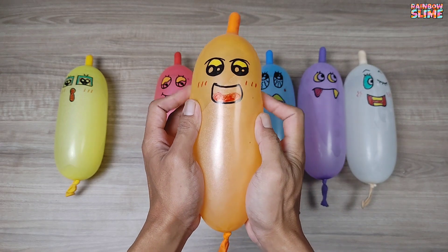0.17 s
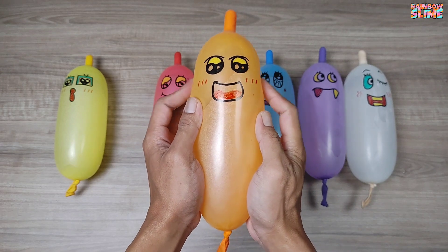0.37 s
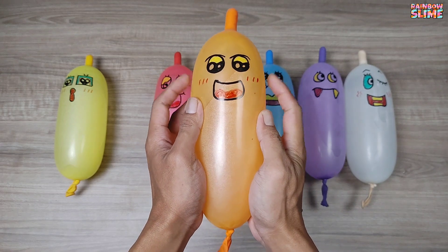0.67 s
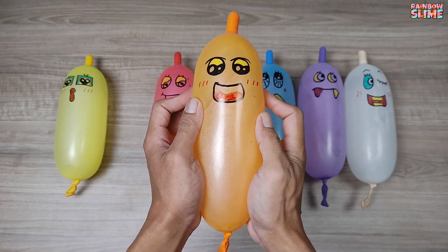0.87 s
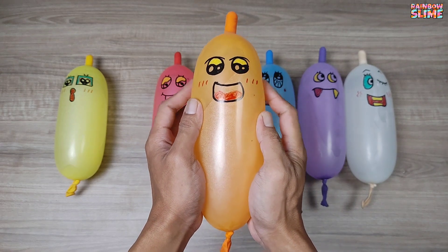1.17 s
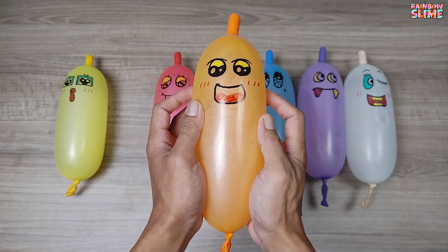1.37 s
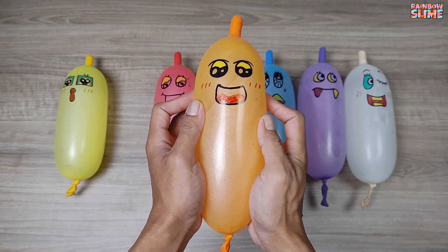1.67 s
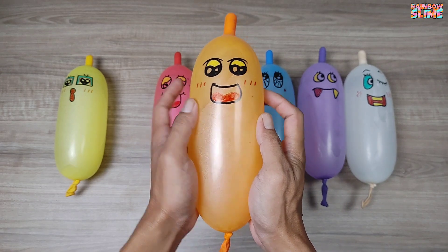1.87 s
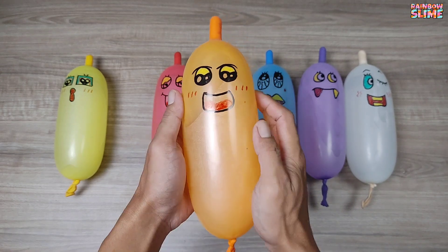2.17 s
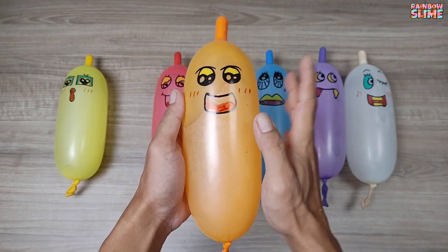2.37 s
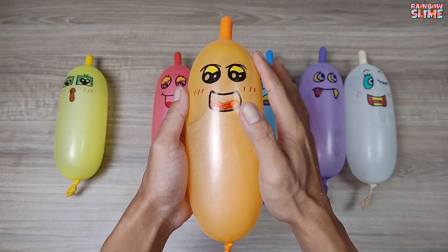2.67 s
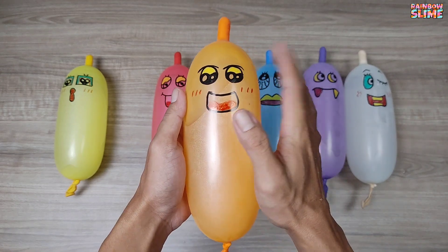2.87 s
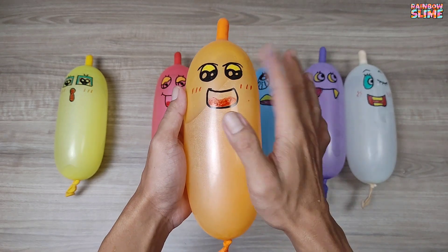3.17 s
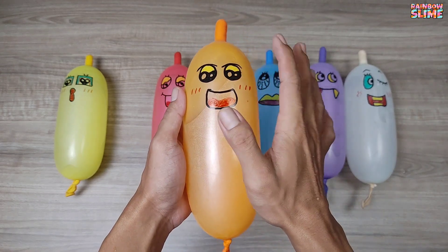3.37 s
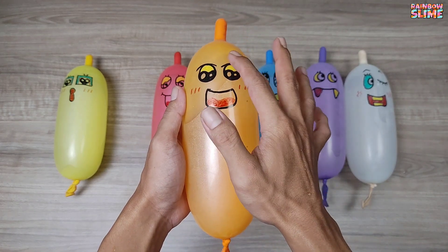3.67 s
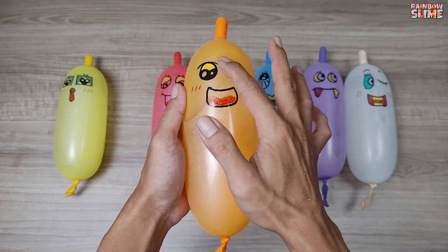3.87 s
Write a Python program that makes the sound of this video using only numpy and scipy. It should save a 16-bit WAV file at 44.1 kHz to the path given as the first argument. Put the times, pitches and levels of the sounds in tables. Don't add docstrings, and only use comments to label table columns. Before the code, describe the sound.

Five quick, stuttering squeaky rubs on a filled rubber balloon, then several light hollow fingertip taps, close up in a quiet room.

```python
import sys
import numpy as np
from scipy import signal
from scipy.fft import rfft, irfft
from scipy.io import wavfile
from scipy.ndimage import uniform_filter1d

SR = 44100
rng = np.random.default_rng(int(sys.argv[2]) if len(sys.argv) > 2 else 0)


def invert_db(level):
    return 10 ** (np.asarray(level, dtype=float) / 20)


def wrap_up_sound(samples):
    columns = np.atleast_2d(samples).T
    tamed = np.clip(columns, -1, 1)
    steps = np.round(tamed * 32767).astype(np.int16)
    wavfile.write(sys.argv[1], SR, steps)


N = 177458

# (start [s], end [s], pressure [dB], dry skin [dB], release [dB/s])
STROKES = [
    (.005, 0.053, -19.5, -96.5, 208),
    (0.093, 0.332, -5, -71.5, 122),
    (0.549, 0.749, -5, -67.5, 110),
    (0.976, 1.123, -3, -67, 111.5),
    (1.367, 1.517, -2.5, -66.5, 115.5),
    (1.743, 1.933, -3.5, -60, 118),
]
# (peak time [s], peak level [dB], wall minus peak [dB])
SLIPS = [(.1227, -31, -30), (.1717, -23, -24), (.1752, -22, -15), (.2107, -24, -27), (.2232, -19, -21),
         (.2659, -18, -21), (.3132, -18, -22), (.5762, -29, -22), (.5888, -20, -23), (.6016, -24, -26),
         (.6048, -20, -19), (.6202, -21, -14), (.6433, -19, -15), (.6583, -20, -12), (.6927, -17, -17),
         (.7091, -24, -12), (.7175, -26, -14), (.73, -16, -14), (.9868, -22, -24), (1.0007, -20, -18),
         (1.0066, -25, -28), (1.0135, -20, -15), (1.0179, -24, -23), (1.0272, -16, -20), (1.0328, -24, -24),
         (1.0461, -22, -15), (1.0646, -18, -19), (1.0773, -25, -11), (1.0808, -21, -17), (1.098, -18, -18)]
# (peak time [s], peak level [dB], wall minus peak [dB])
LATE_SLIPS = [(1.3707, -28, -27), (1.3796, -24, -24), (1.3885, -22, -21), (1.3968, -18, -22),
              (1.4016, -22, -18), (1.41, -17, -18), (1.4147, -18, -17), (1.4272, -18, -24),
              (1.444, -27, -18), (1.4617, -18, -15), (1.4737, -20, -18), (1.4859, -26, -8),
              (1.4975, -26, -14), (1.5041, -20, -13), (1.7494, -22, -27), (1.7588, -19, -24),
              (1.7682, -20, -21), (1.7765, -18, -22), (1.7861, -18, -24), (1.8, -19, -19),
              (1.8166, -19, -19), (1.8223, -23, -28), (1.8355, -23, -11), (1.848, -25, -11),
              (1.8633, -19, -14), (1.869, -24, -11), (1.8825, -19, -13), (1.9033, -17, -16),
              (1.9138, -18, -17), (1.9274, -18, -22)]
# (time [s], peak level [dB], belly re peak [dB], wall re peak [dB])
STICKS = [(0.091, -43, -4, -34), (0.0982, -30, -13, -38), (0.41, -35, -37, -18), (0.444, -41, -2, -15),
          (0.5527, -35.5, -5, -16), (0.831, -41.5, 2.5, -22), (0.9744, -32.5, -38, -18),
          (1.129, -41.5, 1, -1), (1.2265, -39.5, -4.5, -18.5), (1.669, -37, -5, -12),
          (1.6872, -39.5, -22, -33), (1.738, -32, -33, -29), (2.019, -43, -9, -26), (2.0929, -34, -30, -21),
          (2.141, -56, -10, -20), (2.1851, -36.5, -9.5, -20.5), (2.8074, -40.5, -2, -20),
          (2.821, -52.5, 3.5, -22), (2.829, -45, -21, -7.5), (3.098, -50, -9, -20),
          (3.1114, -40.5, -11.5, -15), (3.395, -46, -14, -9), (3.402, -44, -20, -15), (3.41, -42, -9, -12),
          (3.629, -55, -16, -11)]
# (frequency [Hz], width [Hz], level [dB])
BODY = [(965, 60, -45), (1009, 101.5, 9.5), (1003.7, 122, 13), (1322, 190, -2), (1332, 61, 4),
        (1404, 100, -4.5), (1360, 46, -12), (2168, 260, -17.5)]
# (frequency [Hz], width [Hz], level [dB])
WALL = [(3157, 154, -1), (3528, 467, 0.5), (4994, 460, -7.5), (5575, 138, -10.5), (5960, 260, -11),
        (6450, 310, -3.5), (6840, 200, -2.5), (7360, 660, -13.5), (8530, 230, -5), (10900, 1700, -20)]
# (frequency [Hz], width [Hz], level [dB])
BELLY = [(146.5, 16, -13.5), (265.3, 61, -11), (335.7, 23.2, -2.5), (405, 42, 1.5), (473, 47.4, 6.5),
         (676.5, 97, -3)]
# (from [s], low belly [dB], 2.2 kHz ring [dB], 8.5 kHz ring [dB], 5 kHz ring [dB])
GRIPS = [
    (0, 7.5, 6.6, -5, -4),
    (.53, 4, 6.4, -14, -1.5),
    (.95, 2, 2.2, -7, 1.5),
    (1.35, -1.5, 1.2, -1, 3),
    (1.72, -0.5, 2.6, -1, 2.5),
]
# (low edge [Hz], high edge [Hz])
GRIP_BANDS = [
    (120, 340),
    (1900, 2600),
    (8100, 9300),
    (4500, 5700),
]
# (frequency [Hz], width [Hz])
NULLS = [(585, 18.3), (770, 38), (1150, 49), (1860, 153), (2720, 80), (4600, 94), (6200, 650), (8150, 1440)]
# (time [s], peak level [dB], crack [dB], contact [s], belly re peak [dB], after-ring re peak [dB])
TAPS = [
    (2.435, -42, -71, 0.025, -17, -25),
    (2.796, -32, -65.5, 0.031, -15, -26.5),
    (3.086, -31, -61.5, 0.038, -25.5, -24.5),
    (3.376, -32, -61.5, 0.036, -24, -22.5),
    (3.618, -54, -88, 0.029, -24, -29),
    (3.637, -41, -69.5, 0.028, -10, -21),
    (3.655, -42.5, -95, 0.033, -31.5, -32),
]
# (frequency [Hz], width [Hz], level [dB])
TAP_RINGS = [
    [(1000, 170, 8.5), (3400, 31, -7), (4730, 76, -26)],
    [(490, 13, -10), (949, 19.5, 6), (1220, 43, -8.5), (1510, 32, -3), (2316, 42, -17), (3040, 66, -17)],
    [(330, 99, -11.5), (690, 23, -10), (1023, 35, 3), (1274, 38, 4), (1540, 25, 0.5), (2380, 94, -17),
     (3210, 41, -19), (3810, 56, -9.5)],
    [(366, 66, -4.5), (949, 26, 5), (1311, 15, 3), (1554, 53, -5.5), (3380, 41, -3.5), (5200, 75, -13),
     (6300, 54, -17), (7140, 65, -19.5)],
    [(406, 100, -1), (1040, 210, 0), (2440, 240, -8)],
    [(409, 62, -1.5), (1020, 46, 0), (1152, 16, 4), (1275, 25, 5.5), (1527, 15, 8), (3160, 25, -15),
     (3850, 56, -14)],
    [(387, 81, 4), (1020, 64, 5), (1300, 32, 1), (1470, 42, 0)],
]
# (frequency [Hz], width [Hz], level [dB])
AFTER_RING = [(887, 14, 4.5), (1010, 17, -1.5), (304, 4.3, 2.5), (346, 3.6, 6.5)]
# (time [s], length [s], level [dB], brightness [dB])
BRUSHES = [
    (0.436, .02, -66, -4),
    (1.658, 0.018, -65, -4),
    (2.043, 0.043, -62, -3),
    (2.165, 0.039, -66.5, -2.5),
    (2.297, 0.087, -70, -0.5),
    (2.443, .025, -75, -6),
]
# (start [s], end [s], start frequency [Hz], end frequency [Hz], level [dB])
TONES = [
    (3.818, 3.832, 1186, 1340, -58),
    (3.923, 4.098, 2541, 2543, -75.5),
]
# (delay [s], level [dB])
ECHOES = [(.003, -24), (.0086, -14), (0.0106, -18), (0.0126, -14)]
# (low edge [Hz], t60 [s], level [dB])
ROOM = [(145.6, 0.64, -3), (427, 0.35, -2.5), (743, 0.67, -5), (1012, 0.7, -13), (1690, 0.54, -8),
        (2700, 0.67, -9.5), (4370, 0.11, -26.5), (9000, 0.2, -23.5)]
# (frequency [Hz], density [dB per Hz])
AIR = [(25, -11), (45, -0.5), (70, -19), (100, -5.5), (200, 0), (400, -4.5), (1000, -14), (2000, -14.5),
       (3300, -19), (5700, -27.5), (6300, -39.5), (8000, -32.5), (11800, -22.5), (15400, -27.5)]
# (frequency [Hz], level [dB])
HUM = [(101, -79.5), (189, -77.5)]
# (stroke start [dB], stroke end [dB], share of release, rest [dB], share of skin dryness)
CREEP_BODY, CREEP_WALL = (-39.5, -50.5, 0.65, -91.5, 0.02), (-70, -61, 2.33, -102.5, 0.5573)
CREEP_BELLY, CREEP_LOW_BELLY = (-45, -54, 1.5, -94.5, 0.0657), (-58.5, -50, 1.04, -94.5, -0.3454)

SNAP_HZ, SNAP_S = 1182, 0.0005
REBOUND_S, REBOUND_DB, REBOUND_SCATTER_DB = 0.0032, -10, 2.5
CHATTER_DB, CHATTER_SCATTER_DB = -31.5, 1.5
STICK_S, STICK_DB = 0.0085, -11
WALL_START_DB, WALL_END_DB, WALL_SCATTER_DB = -23, -11.5, 0.5
BELLY_DB, BELLY_FOLLOWS = -30, 0.22
BELLY_MOST_DB = -5.5
BELLY_TILT_START_DB, BELLY_TILT_END_DB = 5.5, -6
GRAB_DB_PER_S = 1501.5
USUAL_SKIN_DB = -76
TAP_CREEP_DB, TAP_CREEP_FADE_DB_PER_S = -56, 48
TAP_SKIN_DB, TAP_SKIN_FADE_DB_PER_S = -42, 104.5
SKIN_REST_DB, SKIN_START_DB, SKIN_FADE_DB_PER_S = -94, -6, 72
BRUSH_RISE_DB_PER_S, BRUSH_FADE_DB_PER_S = 597, 302
THUD_S, SLIP_THUD_DB, TAP_THUD_DB = 0.0014, -42, -28
THUD_GROWTH_DB_PER_S = 2
AIR_DB = -70.5


def unit(x):
    return x / np.sqrt(np.mean(x ** 2))


def band(x, lo_hz, hi_hz):
    sos = signal.butter(2, [lo_hz, min(hi_hz, 0.45 * SR)], "band", fs=SR, output="sos")
    return signal.sosfilt(sos, x)


def add(out, s, y):
    i = max(int(s * SR), 0)
    out[i:i + len(y)] += y[:N - i]


def swell(start, end, start_db, end_db, rise_db_s, fade_db_s):
    t = np.arange(N) / SR
    held = np.interp(t, [start, end + 1e-3], [start_db, end_db])
    before, after = np.maximum(start - t, 0), np.maximum(t - end, 0)
    return invert_db(held - rise_db_s * before - fade_db_s * after)


def ring(modes, scatter_db, detune, rise_s):
    hz, width, db = np.array(modes, float).T[:, :, None]
    level_luck, pitch_luck = rng.standard_normal((2, len(modes), 1))
    t = np.arange(8192 if width.min() < 20 else 4096) / SR
    sign = (-1.) ** np.arange(len(modes))[:, None]
    decay = width * np.exp(-np.pi * width * t)
    waves = np.sin(2 * np.pi * hz * (1 + detune * pitch_luck) * t)
    y = (sign * invert_db(db + scatter_db * level_luck) * decay * waves).sum(0)
    y = y * (1 - np.exp(-t / rise_s))
    return y / np.abs(y).max()


def knock(scatter_db, detune):
    u = np.arange(4096) / SR / SNAP_S
    hz = SNAP_HZ * (1 + 0.046 * rng.standard_normal())
    snap = u ** 2 * np.exp(-u) * np.sin(2 * np.pi * hz * u * SNAP_S)
    y = snap + invert_db(-11.5) * ring(BODY, scatter_db, detune, 0.00024)
    return y / np.abs(y).max()


def progress(s):
    start, end = np.array(STROKES)[:, :2].T
    k = max(np.searchsorted(start, s) - 1, 0)
    return np.clip((s - start[k]) / (end[k] - start[k]), 0, 1)


def slip_rows(count=7):
    big = np.array(SLIPS + LATE_SLIPS)
    scatter = rng.standard_normal(big.shape) * [0.0004, REBOUND_SCATTER_DB, 2.5]
    again = big + [REBOUND_S, REBOUND_DB, -2.5] + scatter
    small = []
    for start, end, pressure_db, *_ in STROKES:
        for k, (place, size, bright) in enumerate(rng.standard_normal((count, 3))):
            u = (k + 0.5 + 0.3 * place) / count
            s = start + (end - start) * u
            wait = big[:, 0] - s
            next_slip_s = np.where(wait > 0, wait, 9).min()
            hush_db = STICK_DB * np.exp(-next_slip_s / STICK_S)
            db = CHATTER_DB + pressure_db + hush_db + CHATTER_SCATTER_DB * size
            wall_db = WALL_START_DB + (WALL_END_DB - WALL_START_DB) * u + WALL_SCATTER_DB * bright
            small.append((s, db, wall_db))
    rows = []
    for s, db, wall_db in np.concatenate([big, again, small]):
        belly_db = min(BELLY_DB + BELLY_FOLLOWS * (db + 21) - db, BELLY_MOST_DB)
        rows.append((s, db, belly_db, wall_db))
    return rows


def slips():
    out, modes = np.zeros(N), np.array(BELLY)
    octaves = np.log2(modes[:, 0] / 400)
    for s, db, belly_db, wall_db in slip_rows() + STICKS:
        body = knock(2.5, 0.012)
        wall = ring(WALL, 2.5, 0.012, 0.0008)
        tilt_db = np.interp(progress(s), [0, 1], [BELLY_TILT_START_DB, BELLY_TILT_END_DB]) * octaves
        belly = ring(modes + np.outer(tilt_db, [0, 0, 1]), 3.0, 0.025, 0.0007)
        add(out, s - 0.001, invert_db(db - 2.5) * body + invert_db(db + wall_db) * wall)
        add(out, s - 0.001, invert_db(db + belly_db - 5.0) * belly)
    return out


def grains(rate, spread_db):
    when, sign, size = rng.random(N), rng.standard_normal(N), rng.exponential(size=N)
    return unit((when < rate / SR) * sign * invert_db(spread_db * np.minimum(size, 4)))


def pressure(start_db, end_db, share, rest_db, dry):
    rub, settle = 0, 0
    for start, end, db, skin_db, fade in STROKES:
        dryness = invert_db(dry * (skin_db - USUAL_SKIN_DB))
        rub = rub + dryness * swell(start, end, db + start_db, db + end_db, GRAB_DB_PER_S, share * fade)
    for s, db, *_ in TAPS:
        settle = settle + swell(s, s, db, db, GRAB_DB_PER_S, TAP_CREEP_FADE_DB_PER_S)
    return rub + invert_db(TAP_CREEP_DB + rest_db - CREEP_BODY[3]) * settle + invert_db(rest_db)


def creep():
    body = signal.fftconvolve(grains(900, 1.5), ring(BODY[:-1], 0, 0, 0.0004))[:N]
    push = grains(500, 1.5)
    low_belly = signal.fftconvolve(push, ring(BELLY[:3], 0, 0, 0.001))[:N]
    belly = signal.fftconvolve(push, ring(BELLY[3:], 0, 0, 0.001))[:N]
    wall = signal.fftconvolve(grains(900, 2.5), ring(WALL, 0, 0, 0.0004))[:N]
    out = pressure(*CREEP_BODY) * unit(body) + pressure(*CREEP_WALL) * unit(wall)
    return out + pressure(*CREEP_BELLY) * unit(belly) + pressure(*CREEP_LOW_BELLY) * unit(low_belly)


def grip(x):
    rows = np.array(GRIPS)
    stroke = np.maximum(np.searchsorted(rows[:, 0], np.arange(N) / SR) - 1, 0)
    change = 0
    for k, (lo_hz, hi_hz) in enumerate(GRIP_BANDS):
        change = change + (invert_db(rows[stroke, k + 1]) - 1) * band(x, lo_hz, hi_hz)
    return x + change


def radiate(x):
    for hz, width in NULLS:
        x = 0.22 * x + 0.82 * signal.lfilter(*signal.iirnotch(hz, hz / width, SR), x)
    return x


def taps():
    out, t = np.zeros(N), np.arange(4096) / SR
    for (s, db, crack_db, contact_s, belly_db, after_db), modes in zip(TAPS, TAP_RINGS):
        shake, crack = rng.standard_normal((2, len(t)))
        shake = invert_db(-26.0) * band(shake, 150, 2700) * np.exp(-t / 0.039) * (t < contact_s)
        shake[0] = 1
        damped = np.array(modes) * [1, 1.55, 1]
        add(out, s, invert_db(db) * signal.fftconvolve(shake, ring(damped, 0, 0, 0.000067)))
        add(out, s, invert_db(db + belly_db) * ring(BELLY, 7.4, 0.035, 0.0029))
        add(out, s, invert_db(db + after_db) * ring(AFTER_RING, 2.0, 0.015, 0.039))
        burst = crack * (np.exp(-t / 0.0034) - np.exp(-t / 0.00076))
        add(out, s, invert_db(crack_db + 12.5) * band(burst, 1800, 12500))
    return out


def skin():
    rub, land, dull, bright = np.zeros((4, N))
    for start, end, _, db, _ in STROKES:
        rub += swell(start, end, db + SKIN_START_DB, db, GRAB_DB_PER_S, SKIN_FADE_DB_PER_S)
    for s, db, *_ in TAPS:
        land += swell(s, s, db, db, 5000, TAP_SKIN_FADE_DB_PER_S)
    for s, length, db, up in BRUSHES:
        brush = swell(s, s + length, db, db, BRUSH_RISE_DB_PER_S, BRUSH_FADE_DB_PER_S)
        dull += brush
        bright += invert_db(up) * brush
    rustle = unit(band(grains(3000, 0.71), 1200, 7300))
    crackle = grains(2500, 1.5)
    shift = dull * unit(band(crackle, 1400, 4500))
    shift = shift + invert_db(-3.5) * bright * unit(band(crackle, 3700, 12000))
    return (rub + invert_db(TAP_SKIN_DB) * land + invert_db(SKIN_REST_DB)) * rustle + shift


def thuds():
    out, u = np.zeros(N), np.arange(2048) / SR / THUD_S
    bump = u * np.exp(-u)
    for s, db, _ in SLIPS + LATE_SLIPS:
        add(out, s, invert_db(db + SLIP_THUD_DB + THUD_GROWTH_DB_PER_S * s) * bump)
    for s, db, *_ in TAPS:
        add(out, s, invert_db(db + TAP_THUD_DB) * bump)
    return band(out, 32.5, 220)


def tones():
    out = np.zeros(N)
    for start, end, from_hz, to_hz, db in TONES:
        length = (end - start) * SR
        u = np.arange(int(length)) / length
        phase = 2 * np.pi * np.cumsum(from_hz + (to_hz - from_hz) * u) / SR
        add(out, start, invert_db(db) * np.sin(np.pi * u) * np.sin(phase))
    return out


def room(x):
    t, tail = np.arange(SR) / SR, 0
    for (lo_hz, t60, db), (hi_hz, *_) in zip(ROOM, ROOM[1:] + [(16000,)]):
        fade = np.exp(-np.log(1000) * t / t60) * (1 - np.exp(-t / 0.0037))
        noise = band(rng.standard_normal(SR), lo_hz, hi_hz)
        tail = tail + invert_db(db) * noise * fade / np.sqrt(np.sum(fade ** 2))
    return signal.fftconvolve(x, tail)[:N]


def air():
    hz, db = np.array(AIR).T
    f = np.fft.rfftfreq(N, 1 / SR)
    colour = invert_db(np.interp(np.log(f + 1), np.log(hz), db)) * (f > 18) * (f < 15450)
    hiss = invert_db(AIR_DB) * unit(irfft(rfft(rng.standard_normal(N)) * colour, N))
    wobble = 1 + 0.11 * unit(uniform_filter1d(rng.standard_normal(N), size=2000))
    hum = sum(invert_db(level) * np.sin(2 * np.pi * tone_hz * np.arange(N) / SR) for tone_hz, level in HUM)
    return hiss + wobble * hum


def scene():
    open_air = grip(slips() + creep())
    touch = taps() + tones() + skin()
    rub = radiate(open_air)
    near = rub + touch
    for delay_s, db in ECHOES:
        add(near, delay_s, invert_db(db) * rub)
    to_room = 0.26 * rub + 1.27 * open_air + invert_db(-5) * band(touch, 140, 3700)
    heard = near + room(to_room)
    heard = band(band(heard, 170, 20000), 97, 15000)
    return (heard + thuds() + air())[None]


def roll_off(x):
    return signal.sosfilt(signal.butter(12, 16070, fs=SR, output="sos"), x)


def record(dry):
    return roll_off(dry)


dry = scene()
out = record(dry)
wrap_up_sound(out)
```